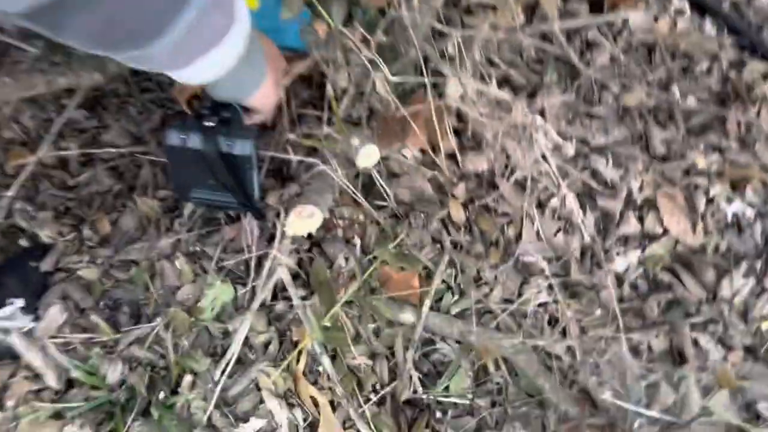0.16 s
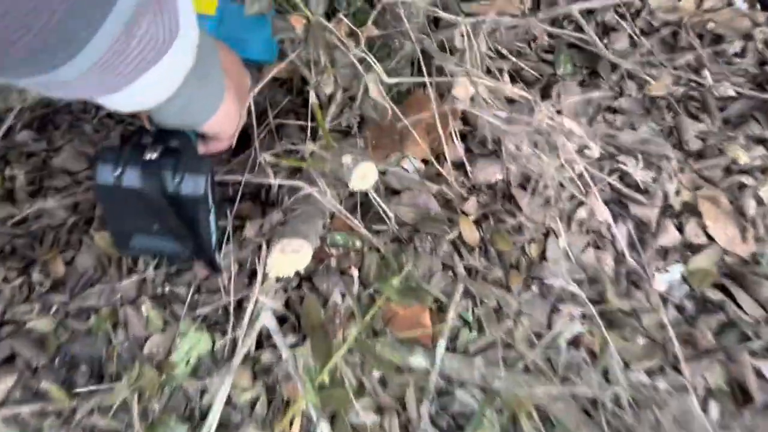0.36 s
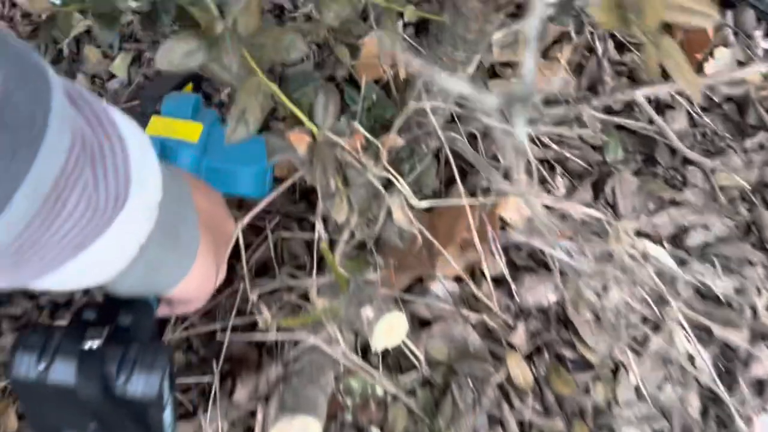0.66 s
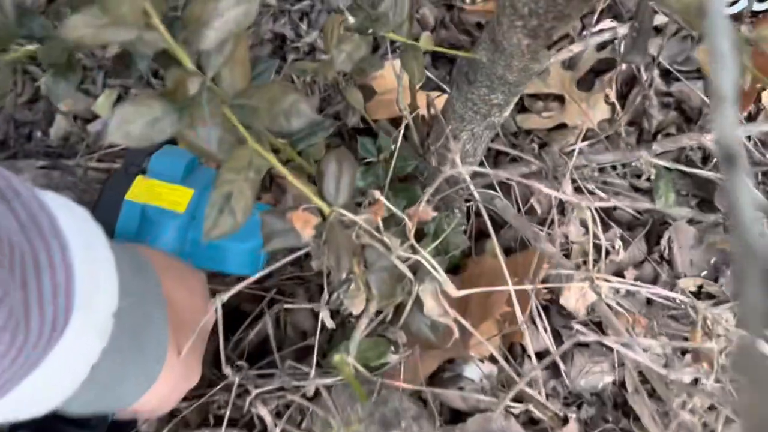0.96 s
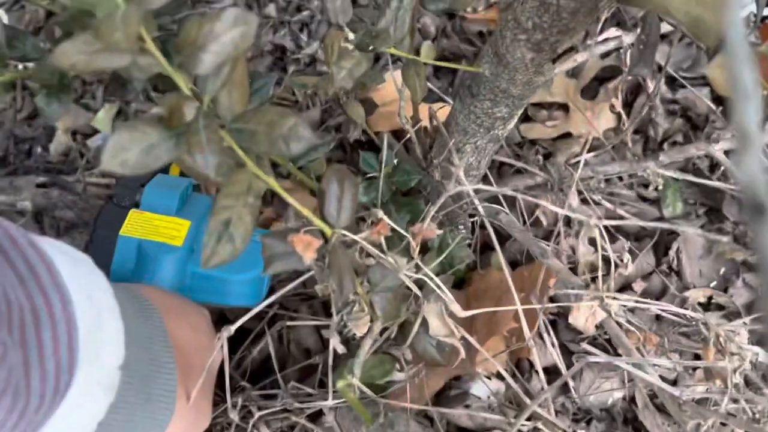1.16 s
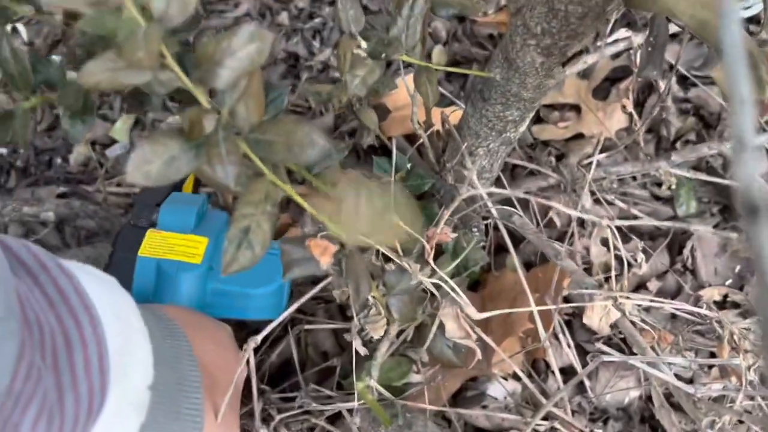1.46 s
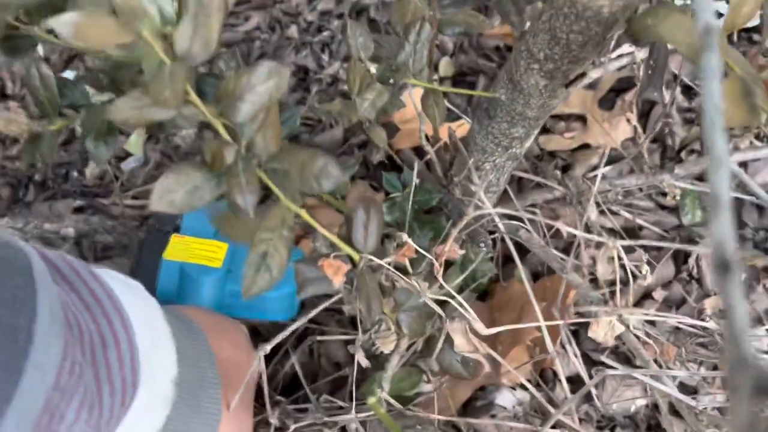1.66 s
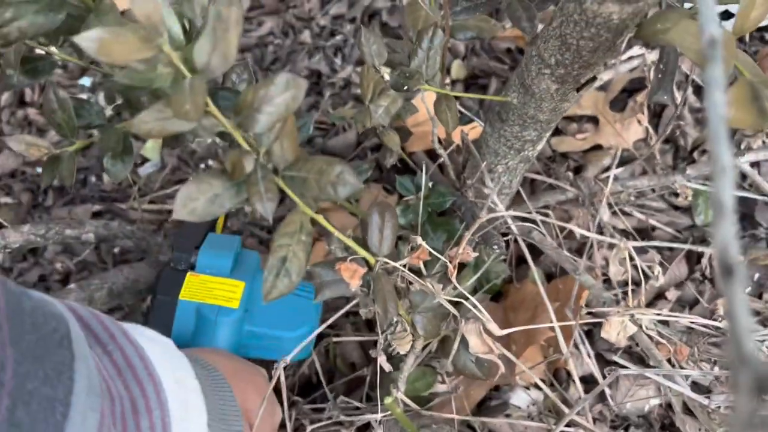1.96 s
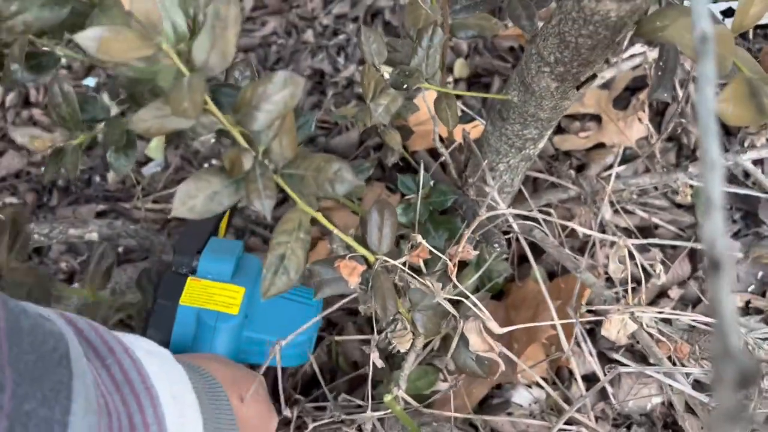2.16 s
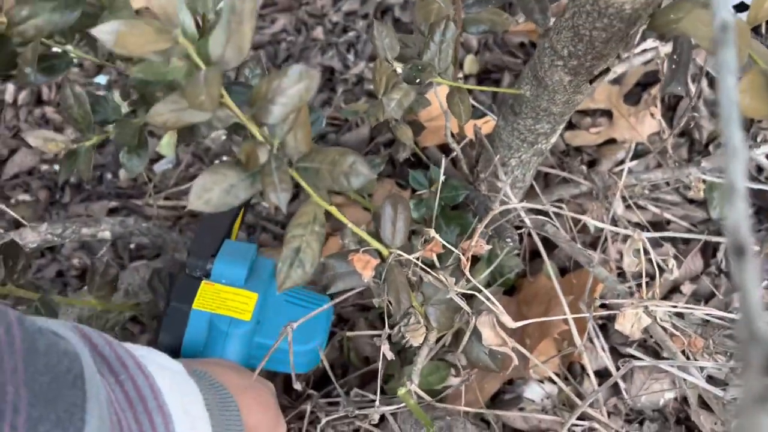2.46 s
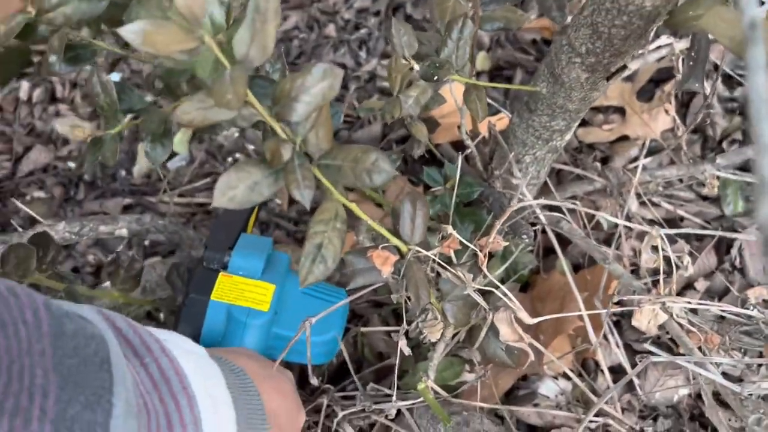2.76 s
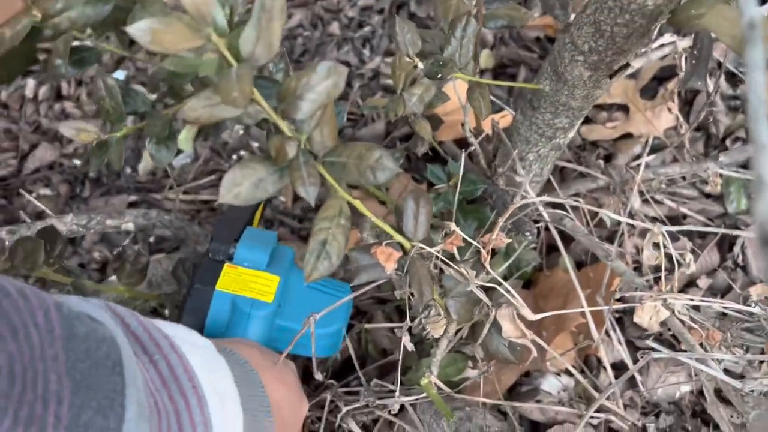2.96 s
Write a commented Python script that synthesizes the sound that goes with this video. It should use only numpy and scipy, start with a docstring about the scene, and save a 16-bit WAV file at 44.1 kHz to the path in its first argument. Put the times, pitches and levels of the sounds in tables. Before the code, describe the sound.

A small cordless chainsaw whines and rattles, then bites jerkily through a woody stem close by.

```python
"""Gear whine and chain rattle are heard first: a small cordless chainsaw, close by outdoors, runs free.
It then bites jerkily through a woody stem, with torn chips and snapping fibres, and runs on more smoothly.
Whine and drive tones are phase-modulated sines; rattle, bar ring, tearing and rumble are noise shaped by
spectra, resonances and level curves. Tooth strikes follow the link rate, which sags during the cut."""
import sys
import numpy as np
from scipy import signal
from scipy.fft import rfft, irfft, next_fast_len
from scipy.io import wavfile
from scipy.ndimage import uniform_filter1d, map_coordinates

SR = 44100
rng = np.random.default_rng(int(sys.argv[2]) if len(sys.argv) > 2 else 0)


def waveform_to_disk(signal):
    """Save audio, clipped to [-1, 1], as 16-bit WAV at the path in sys.argv[1]."""
    frames = np.transpose(np.atleast_2d(signal))
    scaled = np.clip(frames, -1, 1) * 32767
    samples = np.round(scaled).astype(np.int16)
    wavfile.write(sys.argv[1], SR, samples)


def amplitude_ratio(level_db):
    """Convert a level in decibels to the matching linear amplitude (field) ratio."""
    exponent = np.asarray(level_db, float) / 20
    return 10 ** exponent


N = 136710
TIME = np.arange(N) / SR

# Gear-mesh whine: t/s, mesh f/Hz, level/dB, frequency blur/Hz
GEAR_WHINE = [(0, 5580, -34, 22), (.55, 5570, -33, 25), (.66, 5440, -32, 80), (.77, 4980, -33, 200),
              (.9, 5020, -31, 170), (1.1, 5300, -30, 150), (1.3, 5450, -30, 130), (1.5, 5300, -32, 170),
              (1.68, 5000, -35, 250), (1.9, 5150, -38, 220), (2.1, 5300, -36, 50), (2.21, 5340, -35, 45),
              (2.275, 5700, -34, 45), (2.3, 5080, -43, 10), (2.38, 5180, -36.5, 6), (2.52, 5120, -36.5, 6),
              (2.65, 5190, -36.5, 6), (2.73, 5270, -36.5, 6), (2.8, 5285, -36.5, 6), (2.88, 5190, -37, 6),
              (2.97, 5130, -37, 6), (3.1, 5180, -37, 6)]
# Tones locked to the chain: multiple of link rate, level/dB before, during and after the cut, roughness/rad
DRIVE_TONES = [(.843, -44, -58, -56, .25), (1, -40.5, -54, -52, .3), (1.219, -60, -60, -47, .3),
               (1.958, -60, -55, -42, .35), (2.06, -35, -44, -60, 1.2), (3.01, -34, -44, -60, 1.5)]
# Links passing the sprocket: t/s, rate/(1/s); the chain bogs down as it bites
LINK_RATE = [(0, 549), (.56, 549), (.66, 535), (.77, 490), (1.2, 510), (2.25, 515), (3.1, 517)]
# Running chain: t/s, level/dB, share of the late colour (0-1)
RATTLE_LEVEL = [(0, -17, 0.17), (.2, -17, 0.12), (.45, -15, 0.22), (.7, -17.5, 0.07), (1, -16, 0.66),
                (1.3, -17, 0.74), (1.6, -20, 0.53), (1.9, -18.5, 0.72), (2.2, -18.5, .9), (2.265, -18.5, 1),
                (2.285, -19.5, 0.84), (2.33, -18.5, 1), (2.55, -17.5, 0.76), (2.75, -18, 1),
                (2.95, -19, .95), (3.1, -19, 1)]
# Early and late rattle spectra: f/Hz, relative density/(dB per Hz)
RATTLE_EARLY = [(120, -58), (350, -26), (480, -18), (800, -6), (1400, -12), (2000, -6.5), (3100, -2.5),
                (4500, -11), (5300, -6.5), (6500, -7.5), (7600, -10.5), (8500, -9.5), (9300, -10.5),
                (10000, -11.5), (10700, -10), (12000, -7), (13000, -7.5), (14200, -8), (15000, -11),
                (15700, -11.5)]
RATTLE_LATE = [(120, -48), (250, -29.5), (400, -14), (640, -11), (900, -8.5), (1400, -5), (2050, -1),
               (2500, -3), (2950, -2.5), (3500, -4.5), (3900, -5), (4600, -8.5), (6300, -3.5), (7500, -8.5),
               (9000, -8.5), (10600, -12), (11000, -9.5), (11900, -2), (12700, -7), (13500, -10),
               (14700, -2), (15700, -17.5)]
# Resonances of the bar: f/Hz, width/Hz, relative level/dB
BAR_MODES = [(860, 22, -9.5), (1102, 38, -4), (1632, 150, -5.5), (2140, 71, -6), (2610, 104, -12.5)]
# Ringing of the bar: t/s, level/dB
BAR_LEVEL = [(0, -34), (.45, -24.5), (.75, -28), (1, -44.5), (2.2, -37), (2.3, -38), (3.1, -32.5)]
# Tearing wood, also the colour of the lap knocks: f/Hz, relative density/(dB per Hz)
TEAR_SPECTRUM = [(180, -27), (300, -12), (397, -12), (629, -6.5), (818, -0.5), (1180, -2.5), (1530, 3),
                 (2120, -3.5), (2860, 3), (3480, -9.5), (3780, -3), (4310, -11), (5340, -3), (5890, -6),
                 (9980, -12.5), (12200, -10), (15300, -8.5)]
# Low rumble: f/Hz, relative density/(dB per Hz)
RUMBLE_SPECTRUM = [(25, -50), (34, -42), (42, -20), (54, -15), (80, 0.5), (105, -6.5), (130, -14),
                   (160, -8.5), (190, -18), (260, -11.5), (330, -22), (450, -66)]
# Rumble strength: t/s, level/dB
RUMBLE_COURSE = [(0, -51.5), (.5, -50), (.9, -45), (1.5, -49.5), (1.9, -56.5), (2.3, -58), (3.1, -58.5)]
# Teeth grabbing the wood: t/s, level/dB before the crest allowance, length/s,
# thud over the tearing/dB, rasp over the tearing/dB
TOOTH_BITES = [(0.467, -6, 0.02, -34, 4.5), (0.498, -12, 0.018, -33, 11), (0.528, -7, 0.024, -26, 1.5),
               (0.545, -14, 0.022, -25, 4), (0.564, -11.5, 0.022, -24, 8.5), (0.595, -2.5, 0.022, -29, 1.5),
               (0.62, -8.5, 0.02, -19, 7), (0.638, -3, 0.044, -20.5, 1), (0.678, -3, 0.041, -20, 2.5),
               (0.714, -0.5, 0.022, -23, -4), (0.732, -2.5, 0.014, -15.5, 4.5), (0.777, 2, 0.024, -20, 0),
               (0.794, -12, 0.018, -10, 4), (0.848, 0, 0.031, -17.5, 3.5), (0.894, -2, 0.025, -14, 4),
               (0.924, -3, 0.027, -16.5, 2), (0.958, -5, 0.034, -14, 6.5), (0.974, -1.5, 0.056, -16, -1),
               (1.014, -6, 0.022, -21, -3), (1.038, -1.5, 0.012, -14.5, 3.5), (1.057, -9, 0.016, -26, 8),
               (1.08, -1, 0.014, -18, 3.5), (1.108, -6, 0.022, -19, 4), (1.145, -2, 0.024, -23, 3),
               (1.164, -3, 0.03, -14, 3), (1.226, -3, 0.02, -14, 5), (1.255, -0.5, 0.013, -19, 2),
               (1.284, -7.5, 0.024, -13.5, 5.5), (1.313, -4.5, 0.057, -13.5, 4.5),
               (1.369, -3, 0.035, -20, -3), (1.417, 0.5, 0.013, -19, 1.5), (1.45, -5.5, 0.016, -11, 3.5),
               (1.477, -6.5, 0.013, -16, 5), (1.519, 1.5, 0.008, -17, 1), (1.549, -7.5, 0.014, -9, 8),
               (1.574, -6.5, 0.027, -18, 5), (1.61, -3, 0.015, -16, 3.5), (1.649, -5.5, 0.016, -15, 4),
               (1.676, -3.5, 0.012, -14.5, 4), (1.71, -2, 0.03, -17.5, 1), (1.75, -6.5, 0.015, -17, 5),
               (1.787, -5.5, 0.011, -14, 6.5), (1.814, -8, 0.013, -10, 5), (1.846, -14, 0.027, -14, 6),
               (1.873, -6, 0.015, -14, 4), (1.904, -6.5, 0.022, -14, -3), (1.945, -4, 0.011, -28, 2),
               (1.98, -5.5, 0.034, -19.5, 0.5), (2.042, -7.5, 0.029, -19, 2.5), (2.066, -3, 0.017, -18, 1),
               (2.096, -21, 0.019, -14, 1.5), (2.111, -6, 0.022, -15.5, 1.5), (2.134, -3, 0.022, -20, -3),
               (2.159, -8, 0.025, -19, -10), (2.178, -6, 0.026, -29, -1.5), (2.202, -14.5, 0.022, -15, 5),
               (2.236, -13, 0.022, -27, 7), (2.252, -10, 0.022, -20, -4)]
# Thud through the stem: f/Hz, relative density/(dB per Hz)
THUD_SPECTRUM = [(65, -34), (110, -5.5), (178, -4.5), (370, 5), (433, 1.5), (600, 1.5), (780, -11.5),
                 (1320, -120)]
# Fibres snapping: t/s before a fixed delay, level/dB before a fixed offset
FIBRE_SNAPS = [(0.5036, 2), (0.589, -4), (0.6154, -5), (0.636, -5.5), (0.779, -7), (0.8394, -12),
               (0.9253, -10), (0.9512, -8), (1.0572, -2), (1.0807, 0), (1.108, -3.5), (1.1455, -5.5),
               (1.2234, -5), (1.3114, -10), (1.375, -8), (1.4115, -6), (1.45, -9), (1.671, -3),
               (1.706, -13), (1.7883, -1), (1.8155, -1.5), (1.872, -1.5), (1.897, -8), (1.9359, -14),
               (2.1352, -5)]
# Resonances of the stem: f/Hz, width/Hz, relative level/dB
STEM_MODES = [(900, 260, -5.5), (1500, 220, 0), (2150, 640, -6), (3130, 520, -12)]

LOOP_HZ, LOOP_FIRST_S = 19.6, 0.008  # laps of the chain
CUT_IN_S, CUT_OUT_S = 0.72, 2.28


def curves(rows):
    """Linear interpolation: one value per sample for each column after the time."""
    s, *columns = np.transpose(rows)
    return [np.interp(TIME, s, column) for column in columns]


def unit(x):
    """Normalisation to rms 1."""
    return x / np.sqrt(np.mean(x ** 2) + 1e-20)


def wobble(rate):
    """Spline interpolation of random values: a smooth curve with rate knots a second."""
    knots = rng.standard_normal(N // 4)
    return map_coordinates(knots, [np.arange(N) * min(rate / SR, 0.2)])


def coloured(x, points):
    """Minimum-phase filtering: folding the cepstrum makes a causal filter from (f/Hz, level/dB) points."""
    m = 2 ** 18
    f, db = np.transpose(points)
    bins = np.fft.rfftfreq(m, 1 / SR)
    curve_db = np.interp(np.log(bins + 1), np.log(f + 1), db)  # log frequency axis
    cepstrum = irfft(np.log(amplitude_ratio(np.maximum(curve_db, -80))), m)
    cepstrum[1:m // 2] *= 2
    cepstrum[m // 2 + 1:] = 0
    response = np.exp(rfft(cepstrum))
    return unit(irfft(rfft(x, m) * response, m)[:N])


def resonant(x, peaks):
    """Modal superposition: second-order resonances of alternating sign, scaled to rms 1."""
    m = next_fast_len(N + 8192)
    f = np.fft.rfftfreq(m, 1 / SR)
    response = 0
    for k, (centre, width, db) in enumerate(peaks):
        mode = 1j * f * width / (centre ** 2 - f ** 2 + 1j * f * width)
        response = response + (-1) ** k * amplitude_ratio(db) * mode
    return unit(irfft(rfft(x, m) * response, m)[:N])


def gritty(coarse_db, fine_db, patchy_db):
    """Contact noise: many small uneven contacts, each ringing its own patch of frequencies."""
    z = signal.stft(rng.standard_normal(N), nperseg=512)[2]
    field = uniform_filter1d(rng.standard_normal(z.shape), size=2, axis=0)
    field = uniform_filter1d(field, size=3, axis=1)
    depth = np.clip(np.fft.rfftfreq(512, 1 / SR) / 1980, 0.3, 1)[:, None]  # patches deepest above 1980 Hz
    patches = amplitude_ratio(patchy_db * unit(field) * depth)
    x = signal.istft(z * patches, nperseg=512)[1][:N]
    return x * amplitude_ratio(coarse_db * wobble(120) + fine_db * wobble(900))


def swell(times, gains, lengths, rise_s):
    """Addition of powers: each short swell is a Gaussian rise followed by a Gaussian fall."""
    t = TIME - np.asarray(times)[:, None]
    width = np.where(t < 0, rise_s, np.asarray(lengths)[:, None])
    power = np.asarray(gains)[:, None] ** 2 * np.exp(-(t / width) ** 2)
    return power.sum(0)


def motor():
    """Gear meshing and frequency modulation: load blurs the whine, and slower tones turn with the chain."""
    hz, db, blur_hz = curves(GEAR_WHINE)
    phase = 2 * np.pi * np.cumsum(hz + np.abs(blur_hz) * wobble(450)) / SR
    whine = amplitude_ratio(db + 1.7 * wobble(60)) * np.sin(phase)

    turn = 2 * np.pi * np.cumsum(curves(LINK_RATE)[0]) / SR
    lap = np.cos(2 * np.pi * LOOP_HZ * (TIME - LOOP_FIRST_S))
    stages = [CUT_IN_S - 0.05, CUT_IN_S + 0.1, CUT_OUT_S - 0.03, CUT_OUT_S + 0.032]
    flutter_db = 3  # per radian of roughness: the rougher tones swell more, once a lap
    tones = 0
    for multiple, before_db, cut_db, after_db, rough in DRIVE_TONES:
        tone_db = np.interp(TIME, stages, [before_db, cut_db, cut_db, after_db])
        tone_db = tone_db + 1.35 * wobble(18) + flutter_db * rough * lap
        tones = tones + amplitude_ratio(tone_db) * np.sin(multiple * turn + rough * wobble(60))
    return np.sqrt(2) * (whine + tones)  # table levels are rms


def chain():
    """Contact excitation and resonance: links rattle, the bar rings, and a stiff link knocks once a lap."""
    db, share = curves(RATTLE_LEVEL)
    share = np.clip(share, 0, 1)
    early = coloured(gritty(0.4, 1.5, 2.44), RATTLE_EARLY)
    late = coloured(gritty(0.85, 1.1, 1.73), RATTLE_LATE)
    rattle = np.sqrt(1 - share) * early + np.sqrt(share) * late  # equal-power blend
    rattle = amplitude_ratio(db + 0.17 * wobble(22)) * rattle

    ring_db, = curves(BAR_LEVEL)
    bar = amplitude_ratio(ring_db) * resonant(gritty(1.9, 0.9, 2.7), BAR_MODES)

    laps = np.arange(LOOP_FIRST_S, 0.44, 1 / LOOP_HZ)  # only while the chain runs free
    knock_db, knock_s = np.full(len(laps), -23.5), np.full(len(laps), 0.004)
    knocks = np.sqrt(swell(laps, amplitude_ratio(knock_db), knock_s, rise_s=0.0036))
    struck = np.sign(rng.standard_normal(N))
    direct_knocks = knocks * coloured(struck, TEAR_SPECTRUM)
    bar_knocks = 1.3 * knocks * resonant(struck, BAR_MODES)
    return rattle + bar + direct_knocks + bar_knocks


def rumble():
    """Filtered noise: a low rumble that swells early in the cut, then fades below its opening level."""
    db, = curves(RUMBLE_COURSE)
    return amplitude_ratio(db) * coloured(rng.standard_normal(N), RUMBLE_SPECTRUM)


def teeth():
    """Impulsive excitation: the gain jumps at each cutter strike, uneven in time and size, then decays."""
    links_per_tooth, scatter = 4, 0.35  # scatter in tooth spacings
    depth, decay_s = 1.8, 0.0011  # how far a strike stands over the tearing, and its decay time
    rate, = curves(LINK_RATE)
    passed = np.cumsum(rate / links_per_tooth) / SR + scatter * wobble(70)
    at = np.flatnonzero(np.diff(np.floor(passed)) > 0)
    sizes = rng.uniform(0.3, 1.68, len(at))
    strikes = np.bincount(at, sizes, N)
    decay = np.exp(-np.arange(512) / SR / decay_s)
    return 1 + depth * np.convolve(strikes, decay)[:N]


def cutting():
    """Fracture under moving teeth: each grab tears chips, rasps and thuds through the stem; fibres snap."""
    s, db, length, thud_db, rasp_db = np.transpose(TOOTH_BITES)
    crest_db = 13.5  # allowance taken off every bite level

    def grab(extra_db):
        """Envelope of all bites, raised by extra_db."""
        return np.sqrt(swell(s, amplitude_ratio(db - crest_db + extra_db), length, rise_s=0.0054))

    chips = coloured(teeth() * gritty(1.0, 1.26, 2.06), TEAR_SPECTRUM)
    split = signal.butter(2, 2310, fs=SR, output="sos")  # woody tearing below 2310 Hz, rasp above
    woody = signal.sosfiltfilt(split, chips)
    rasp = chips - woody
    thud = coloured(teeth() * gritty(0.58, 0.67, 1.1), THUD_SPECTRUM)

    snap_s, snap_db = np.transpose(FIBRE_SNAPS)
    snap_length = np.full(len(snap_s), 0.003)
    snap_power = swell(snap_s + 0.0023, amplitude_ratio(snap_db - 12), snap_length, rise_s=0.001)
    snaps = np.sqrt(snap_power) * resonant(gritty(0.4, 3.5, 0.4), STEM_MODES)
    return grab(0) * woody + grab(rasp_db) * rasp + grab(thud_db) * thud + snaps


def scene():
    """Linear superposition of all parts of the saw, in one channel."""
    return (motor() + chain() + rumble() + cutting())[None]


def top_cut(x):
    """Nothing passes above the cut-off."""
    return signal.sosfilt(signal.butter(12, 16760, fs=SR, output="sos"), x)


def record(dry):
    """Saturation and band limiting: the recorder rounds off the highest peaks and removes the extreme top."""
    ceiling, top_hz = 0.9, 15740  # ceiling relative to full scale
    rounded = dry / (1 + np.abs(dry / ceiling) ** 6) ** (1 / 6)
    spectrum = rfft(rounded, axis=1) * (np.fft.rfftfreq(N, 1 / SR) < top_hz)
    mix = irfft(spectrum, N, axis=1)
    return top_cut(mix)


dry = scene()
out = record(dry)
waveform_to_disk(out)
```